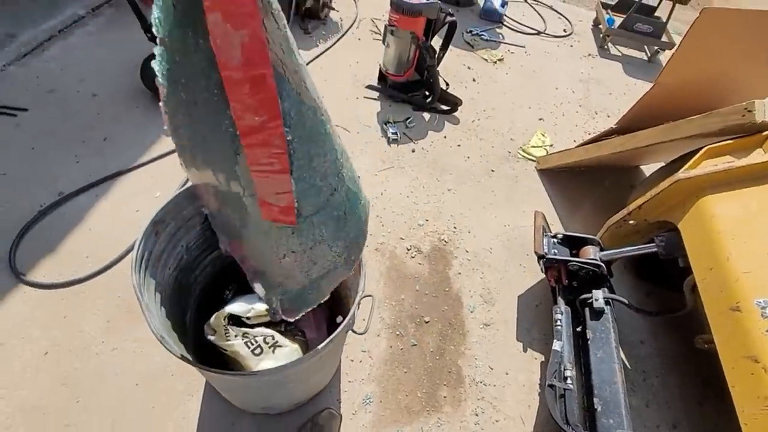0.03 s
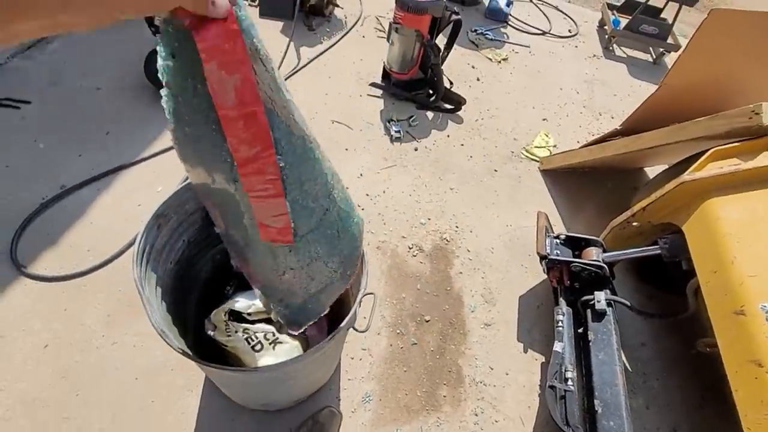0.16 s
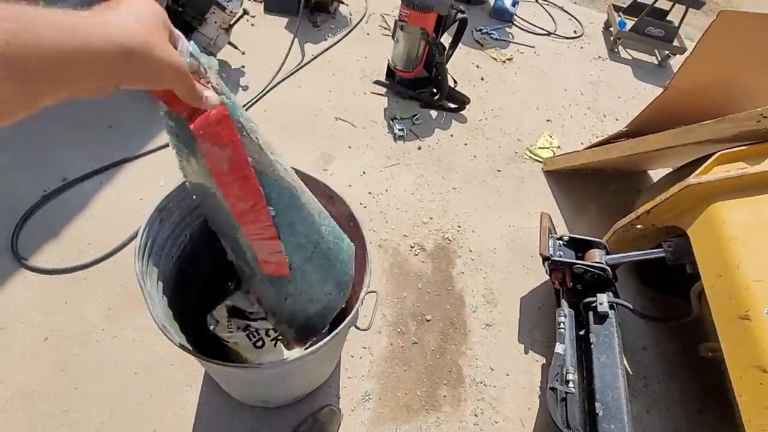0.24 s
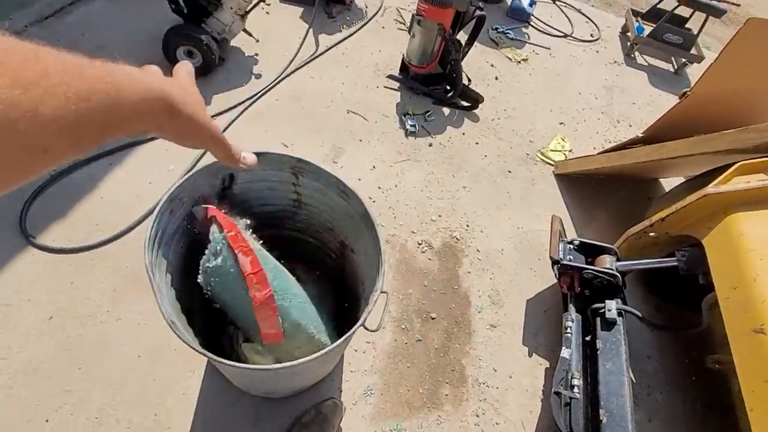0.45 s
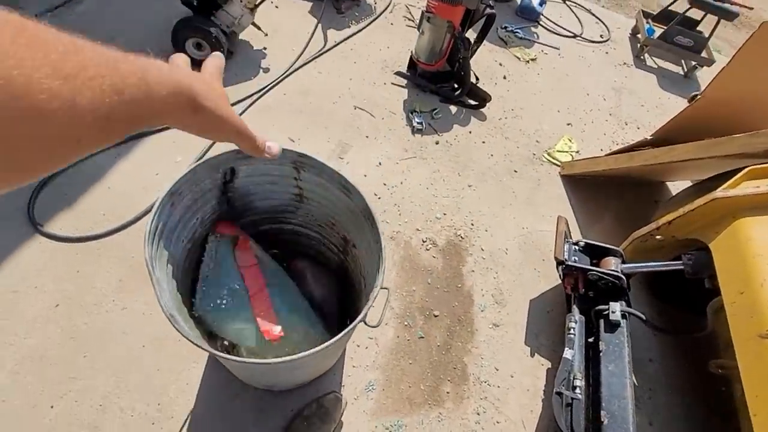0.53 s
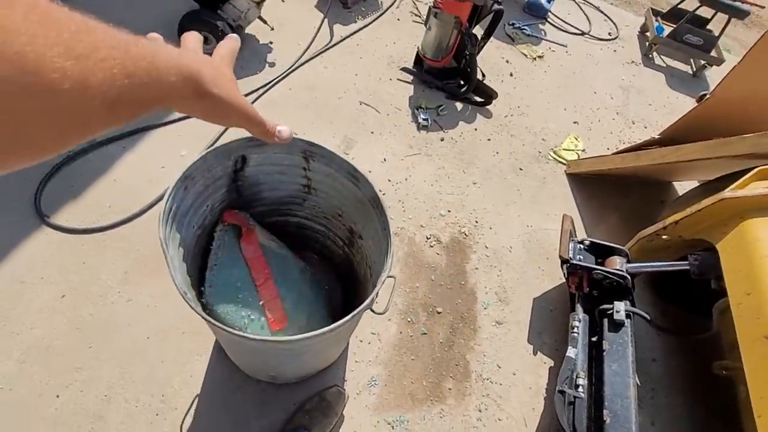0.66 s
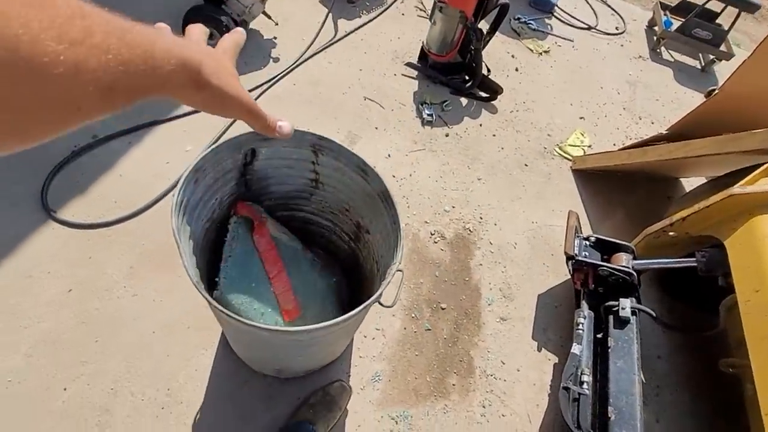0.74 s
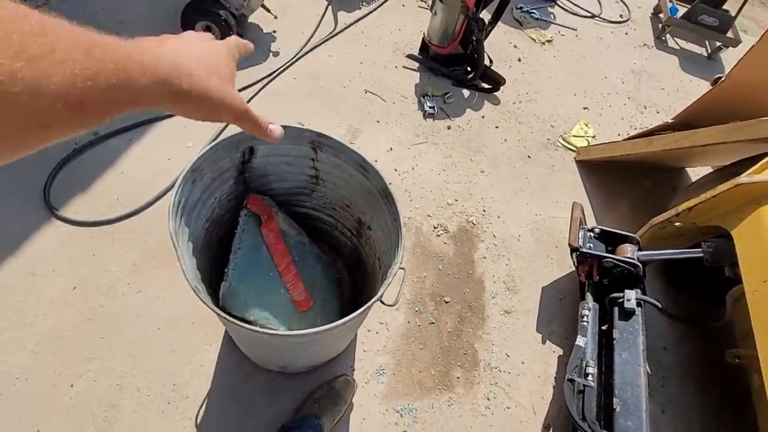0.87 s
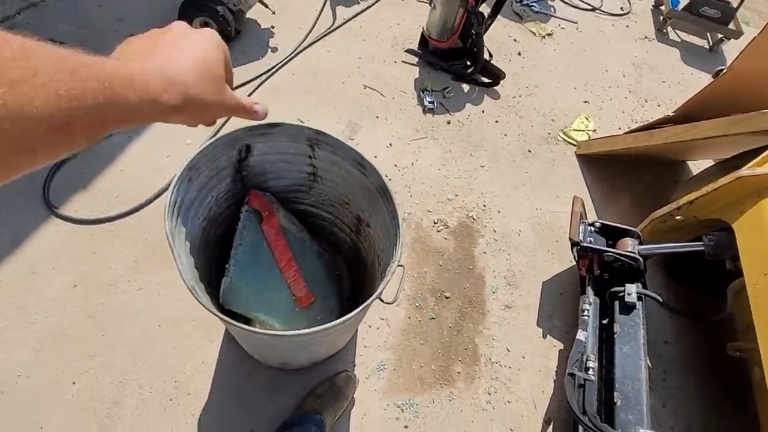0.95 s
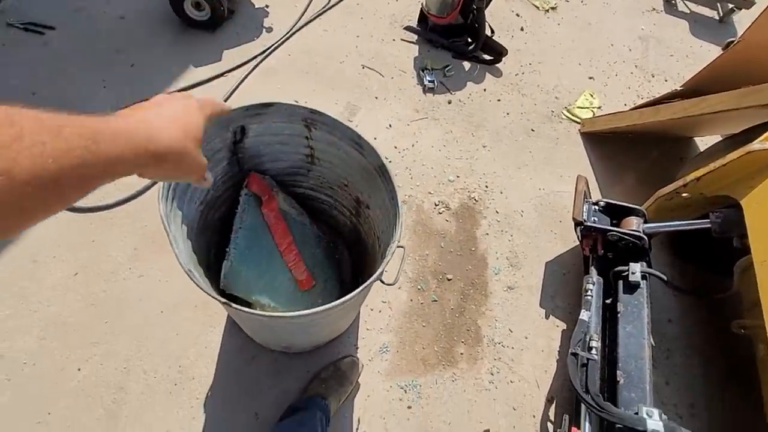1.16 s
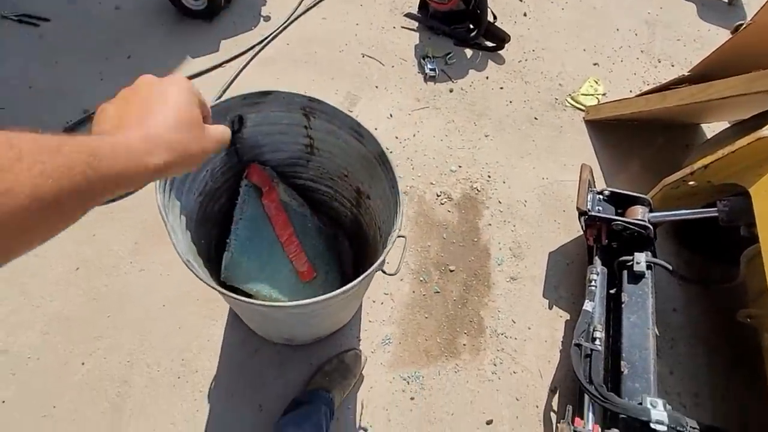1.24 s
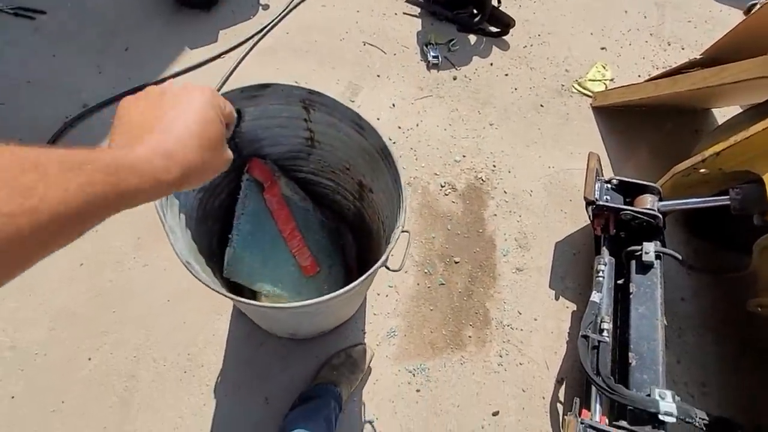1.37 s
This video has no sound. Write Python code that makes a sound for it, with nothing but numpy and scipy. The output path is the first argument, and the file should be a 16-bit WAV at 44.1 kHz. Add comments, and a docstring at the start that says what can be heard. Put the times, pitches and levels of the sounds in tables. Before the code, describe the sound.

Broken glass crashes loudly into a steel trash can, close to a stereo microphone in an open yard. A few tiny clinks come first; afterwards fragments tinkle and slide in bursts while the can knocks and rattles on the ground.

```python
"""Shattered glass into a steel bin

A folded pane of shattered safety glass is dropped into a steel bin outdoors, near a two-port microphone.
A few crumbs tick first, then a dense shower crashes and drums on the bin; the heap slumps a few more times,
the bin knocks and judders on the ground. Faint yard noise lies under all. Random impacts are filtered into
hiss, drumming and boom; ringing crumbs and clanks are fading sine waves; dull knocks are single pushes.
"""
import sys
import numpy as np
from scipy import signal
from scipy.fft import rfft, irfft, next_fast_len
from scipy.io import wavfile
from scipy.ndimage import map_coordinates

SR = 44100
rng = np.random.default_rng(int(sys.argv[2]) if len(sys.argv) > 2 else 0)


def generate_wav(sig):
    """Save sig (samples, or channels by samples) to the path in sys.argv[1] as 16-bit PCM at SR."""
    pcm = np.round(np.clip(np.atleast_2d(sig).T, -1, 1) * 32767).astype(np.int16)
    wavfile.write(sys.argv[1], SR, pcm)


def attenuation_scalar(level_db):
    """Turn a level in dB into a linear amplitude multiplier (20 dB per decade)."""
    decades = np.asarray(level_db, float) / 20
    return 10 ** decades


N = 61739  # length in samples
T = np.arange(N) / SR  # time of each sample, s

# Tone colour of hissing glass: frequency_hz, relative_level_db (per Hz)
GLASS = [(1200, -33), (2000, -5), (2600, -6.5), (3200, -7), (4700, -3), (6700, -6), (10500, -11.5),
         (15900, -14)]
# The left port hears most fragments first: typical lead and its random spread
LEAD_S, LEAD_SPREAD_S = .00027, .00007


def unit(x):
    """Scale a sound to an rms of 1."""
    return x / np.sqrt(np.mean(x ** 2) + 1e-20)


def along(points, hz):
    """Read a curve of (Hz, value) points on a logarithmic frequency axis."""
    f, v = np.transpose(points)
    return np.interp(np.log(hz + 1), np.log(f + 1), v)


def over_time(points):
    """Read a curve of (s, value) points at every sample."""
    return np.interp(T, *np.transpose(points))


def filtered(x, response):
    """Filter a sound by multiplying its spectrum by a response."""
    m = next_fast_len(N + SR // 2)  # spare room keeps tails from wrapping round
    return irfft(rfft(x, m) * response(np.fft.rfftfreq(m, 1 / SR)), m)[..., :N]


def body(peaks):
    """Give the response of a ringing body: a sum of (Hz, width Hz, dB) resonances, signs alternating."""
    def response(f):
        total = 0
        for k, (centre, width, db) in enumerate(peaks):
            damping = 1j * f * width
            total = total + (-1) ** k * attenuation_scalar(db) * damping / (centre * centre - f * f + damping)
        return total
    return response


def shaped(level, source, response):
    """Filter a source under a changing level, undoing the filter's effect on the source's loudness."""
    return filtered(level * source, response) / np.std(filtered(source, response))


def place(s, lead_s, shapes):
    """Add one short shape per time into both ports; a positive lead makes the left one earlier."""
    ports = []
    for side in (-.5, .5):
        first = np.round((s + side * lead_s) * SR).astype(int)
        at = first[:, None] + np.arange(shapes.shape[1])
        ports.append(np.bincount(np.clip(at, 0, N).ravel(), shapes.ravel(), N + 1)[:N])
    return np.array(ports)


def fragments(count, scatter_db, lead_s=LEAD_S):
    """Draw times, leads and signed sizes of falling crumbs, and two spare random numbers for each."""
    z, u = rng.standard_normal((count, 4)), rng.random((count, 2))
    size = np.sign(z[:, 0]) * attenuation_scalar(-scatter_db * np.log(u[:, 0] + .02))
    return u[:, 1] * N / SR, lead_s + LEAD_SPREAD_S * z[:, 1], size, z[:, 2:]


def hail(count, scatter_db, lead_s=LEAD_S):
    """Scatter bare one-sample impacts, partly of opposite sign in the two ports, at an rms of 1."""
    s, lead_s, size, z = fragments(count, scatter_db, lead_s)
    common = place(s, lead_s, size[:, None])
    opposite = place(s, lead_s, size[:, None] * z[:, :1]) * [[1], [-1]]
    return unit(common + .28 * opposite)


def pings(level, centre_hz, spread, count, scatter_db):
    """Let crumbs ring briefly at their own pitches, each as strong as the level at its start."""
    s, lead_s, size, z = fragments(count, scatter_db)
    centre = centre_hz[(s * SR).astype(int), None]
    hz = np.clip(centre * np.exp(spread * z[:, :1]), 2700, 15000)
    turns = hz * T[:700]
    life = 55 * np.exp(.6 * z[:, 1:])  # turns until 60 dB down
    rings = np.sin(2 * np.pi * turns) * attenuation_scalar(-60 * turns / life) * size[:, None] * np.sqrt(hz / life)
    scale = np.sqrt(np.sum(rings ** 2) / N)
    return place(s, lead_s, rings * np.interp(s, T, level)[:, None] / scale)


def yard():
    """Filter noise into a far outdoor murmur, alike in both ports only in the bass."""
    # Tone colour of the yard: frequency_hz, relative_level_db (per Hz)
    yard_colour = [(25, 12), (100, -2), (200, 6.5), (400, -8), (1100, -15.5), (2460, -32), (6870, -28),
                   (15900, -26.5)]
    level_db = -47
    middle, b = rng.standard_normal((2, N))
    side = filtered(b, lambda f: f / np.hypot(f, 700))
    ports = np.array([middle + side, middle - side])
    return attenuation_scalar(level_db) * unit(filtered(ports, lambda f: attenuation_scalar(along(yard_colour, f))))


def shower():
    """Let many crumbs hiss as they strike, ring at their own pitches and stir the air in the bin."""
    # Strength of the falling glass before clumping: time_s, level_db
    shower_curve = [(0, -49.5), (.07, -53.5), (.135, -65), (0.211, -49.5), (.229, -34.5), (0.236, -22),
                    (.3, -16.5), (.37, -15.5), (.5, -14.5), (0.561, -21), (.67, -30), (.9, -28.5),
                    (1.075, -34.5), (1.2, -31), (1.28, -35), (1.4, -37.5)]
    # Pitches near which the crumbs ring: pitch_hz
    crumb_pitches = [3247, 4726, 6014, 7010]
    # Resonances of the air in the bin: frequency_hz, width_hz, relative_level_db
    air_peaks = [(1310, 264, 13), (1850, 740, 6.5)]
    ring_db, ring_spread = -3, 0.0768  # ringing level over the shower, log spread of pitch
    surge_db, surge_rate = 1.5, 60  # crumbs come in clumps: depth, random points a second

    smooth_db = over_time(shower_curve)
    # the air follows the shower a little more than dB for dB, around -19 dB
    air_db = -4 + 0.098 * (smooth_db + 19)
    knots = rng.standard_normal(int(N / SR * surge_rate) + 4)
    glass_db = smooth_db + surge_db * map_coordinates(knots, [T * surge_rate])

    hiss = shaped(attenuation_scalar(glass_db), hail(count=12000, scatter_db=0), lambda f: attenuation_scalar(along(GLASS, f)))
    ring = pings(attenuation_scalar(glass_db + ring_db), rng.choice(crumb_pitches, N), ring_spread,
                 count=4000, scatter_db=-0.5)
    air = shaped(attenuation_scalar(glass_db + air_db), hail(count=5000, scatter_db=5.0), body(air_peaks))
    return hiss + ring + air


def slumps():
    """Start each slump or single crumb fast and thin it out; its ringing outlasts its hiss."""
    # Sudden slumps of glass: start_s, level_db, hiss_t60_s (time to fall 60 dB), pitch_hz
    slump_rows = [(0.0044, -36, 0.16, 6280), (0.2766, -17, 0.024, 4430), (0.5606, -10.5, 0.24, 4840),
                  (0.7203, -17.5, 0.089, 4300), (0.7374, -16.5, 0.068, 4200), (0.8138, -14, 0.091, 4780),
                  (0.948, -15.5, 0.077, 3400), (0.9575, -10.5, 0.088, 5270), (1.084, -14.5, 0.052, 8580),
                  (1.125, -21.5, 0.12, 4580), (1.1573, -13, 0.09, 4930), (1.189, -22.5, 0.043, 7900),
                  (1.1993, -12.5, 0.026, 3130), (1.3094, -25.5, 0.15, 4880), (1.3455, -19.5, 0.054, 5020)]
    # Single crumbs before the crash: start_s, level_db
    tick_rows = [(0.1433, -35), (0.183, -33), (0.2117, -26), (0.2232, -17.5)]
    tick_t60_s, tick_hz = .014, 6800
    rise_s = 0.00051
    ring_db, ring_lasts = -7, 2.47  # ringing level over the hiss, its t60 over that of the hiss
    tilt_db = 2.5  # per octave, brighter than the shower

    ticks = [(s, db, tick_t60_s, tick_hz) for s, db in tick_rows]
    rows = np.array(ticks + list(slump_rows))
    s, db, t60, hz = rows[np.argsort(rows[:, 0])].T[..., None]
    age = np.maximum(T - s, 0)

    def fall(lasts):
        decay_db = -60 * age / np.maximum(t60 * lasts, .005)
        return np.sum(attenuation_scalar(db - 5 + decay_db) * (1 - np.exp(-age / rise_s)), axis=0)

    # crumbs take the pitch of the latest slump or tick
    latest = np.maximum(np.searchsorted(s[:, 0], T) - 1, 0)
    hiss = shaped(fall(1), hail(count=20000, scatter_db=1.5),
                  lambda f: attenuation_scalar(along(GLASS, f) + tilt_db * np.log2(f / 5000 + .01)))
    ring = pings(attenuation_scalar(ring_db) * fall(ring_lasts), hz[latest, 0], spread=0.097, count=4000, scatter_db=2.0)
    return hiss + ring


def clanks():
    """Clank the pane's edge on the wall: sine waves with a soft start that die away by their sharpness."""
    # Clanks: start_s, level_db, pitch_hz, sharpness_q (no unit; higher rings longer)
    clank_rows = [(0.1068, -25.5, 430, 2.9), (0.325, -5.5, 1480, 34), (0.352, -4.5, 1330, 30),
                  (0.469, -21, 1330, 30), (0.696, -20.5, 1410, 17), (.747, -22, 1382, 59),
                  (.952, -21.5, 1337, 70), (1.066, -19, 875, 7.6), (1.197, -23, 1450, 26)]
    s, db, hz, q = np.transpose(clank_rows)[..., None]
    turns = hz * T[:2500]
    fade = np.exp(-np.pi * turns / q) * (1 - np.exp(-2 * turns))
    return place(s[:, 0], LEAD_S, attenuation_scalar(db) * np.sin(2 * np.pi * turns) * fade)


def drumming():
    """Drum impacts on the bin, whose wall and bottom resonate and radiate little treble."""
    # Strength of the drumming: time_s, level_db
    drum_curve = [(.2, -87), (.231, -36), (.243, -17.5), (.29, -17.5), (.47, -17), (.55, -21), (.6, -28.5),
                  (.68, -34.5), (.73, -23.5), (.79, -26.5), (.85, -33.5), (.87, -36), (.915, -36.5),
                  (.935, -27.5), (1.06, -36), (1.09, -37.5), (1.4, -41.5)]
    # Resonances of bin wall and bottom: frequency_hz, width_hz, relative_level_db
    bin_peaks = [(121, 64, -6.5), (210, 72, -3.5), (276, 45, 0), (325.4, 11.7, 3), (377, 42, -6.5),
                 (487, 47, -2.5), (740, 364, -8.5)]
    roll_hz = 987  # the wall radiates little above
    impacts = hail(count=2000, scatter_db=1.5, lead_s=.00038)
    return shaped(attenuation_scalar(over_time(drum_curve)), impacts,
                  lambda f: body(bin_peaks)(f) / np.hypot(1, (f / roll_hz) ** 4))


def boom():
    """Boom the bin bottom: impacts pass twice through one deep resonance."""
    # Strength of the boom: time_s, level_db
    boom_curve = [(.215, -85), (.24, -33), (.36, -30.5), (.55, -27.5), (.65, -48), (.8, -60), (1.0, -41),
                  (1.07, -29.5), (1.11, -38.5), (1.4, -41)]
    bottom = body([(78, 50, 0)])  # Hz, width Hz, dB
    return shaped(attenuation_scalar(over_time(boom_curve)), hail(count=1500, scatter_db=1.3), lambda f: bottom(f) ** 2)


def dull_pushes(s, db):
    """Push the bin once at each time; its low resonances answer and the treble is softened."""
    # Resonances of a knock: frequency_hz, width_hz, relative_level_db
    knock_peaks = [(255, 190, 3), (570, 580, -7)]
    push_db, lead_s = 33, .0002  # the push makes up for what the filter takes from the peak
    pushes = place(s, lead_s, -attenuation_scalar(db + push_db)[:, None])
    return filtered(pushes, lambda f: body(knock_peaks)(f) / (1 + 1j * f / 1000) ** 3)


def knocks():
    """Knock the bin dully with single pushes."""
    # Dull knocks: start_s, peak_db
    knock_rows = [(0.653, -16), (0.882, -19), (0.928, -18.5), (.994, -20.5), (1.038, -16), (1.069, -16),
                  (1.08, -23), (1.238, -18.5), (1.245, -19.5), (1.269, -25), (1.285, -22), (1.299, -32),
                  (1.314, -26), (1.332, -21.5), (1.352, -24), (1.357, -27), (1.368, -20.5), (1.387, -25)]
    s, db = np.transpose(knock_rows)
    return dull_pushes(s, db)


def judder():
    """Judder the bin on the ground: seven slips whose gaps grow longer while they weaken."""
    first_s, gap_s, slows = 1.0925, .0172, 1.04  # first slip, first gap, each next gap over the last
    peak_db, fade_db = -19, .5  # first slip's peak, loss a slip
    k = np.arange(7)
    s = first_s + gap_s * (slows ** k - 1) / (slows - 1)
    return dull_pushes(s, peak_db - fade_db * k)


def scene():
    """Add all sounds at the bin, tint the two ports differently and lay the yard under them."""
    # Balance of the ports: frequency_hz, left_over_right_db
    port_balance = [(60, -0.5), (380, 2.5), (1000, 4), (4400, 0), (8120, -2.5), (15000, 5.5)]
    near = shower() + slumps() + clanks() + drumming() + boom() + knocks() + judder()
    # half the difference goes to each port, with opposite signs
    return filtered(near, lambda f: attenuation_scalar(np.outer([.5, -.5], along(port_balance, f)))) + yard()


def top_cut(x):
    """Nothing passes above the cut-off."""
    return signal.sosfilt(signal.butter(12, 16010, fs=SR, output="sos"), x)


def record(dry):
    """Round off loud peaks, drop the deep bass and cut everything above 15.8 kHz sharply."""
    ceiling, knee = 1.05, 5  # full-scale limit, sharpness of the bend towards it
    low_hz, top_hz = 53.4, 15780
    rounded = dry / (1 + np.abs(dry / ceiling) ** knee) ** (1 / knee)
    mix = filtered(rounded, lambda f: (1j * f / (low_hz + 1j * f)) ** 2 * (f < top_hz))
    return top_cut(mix)


dry = scene()
out = record(dry)
generate_wav(out)
```